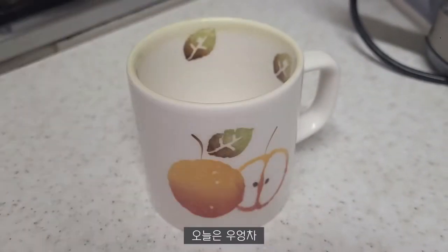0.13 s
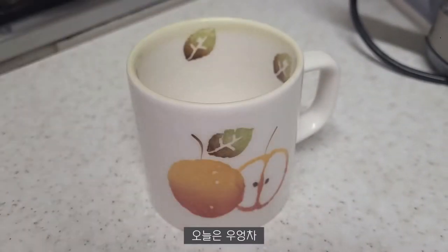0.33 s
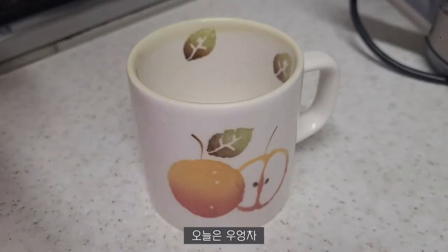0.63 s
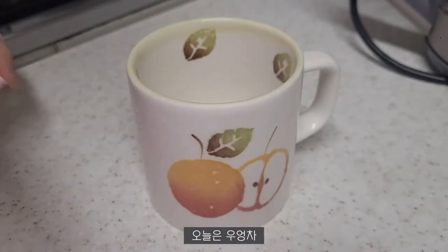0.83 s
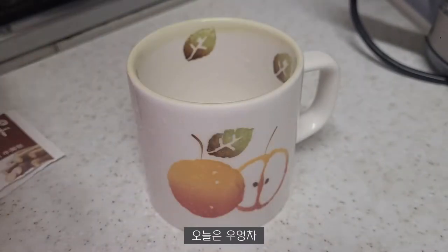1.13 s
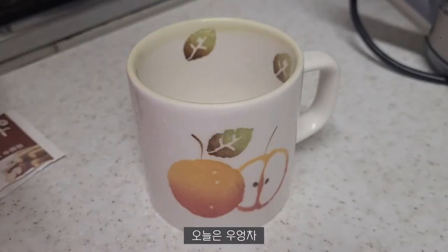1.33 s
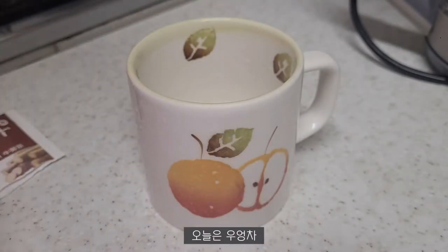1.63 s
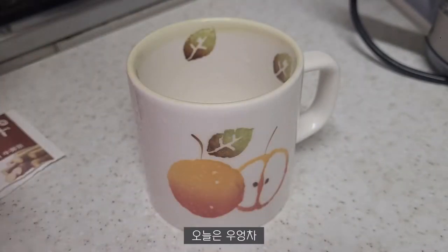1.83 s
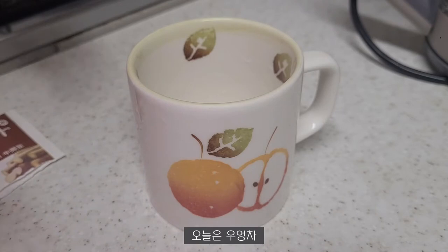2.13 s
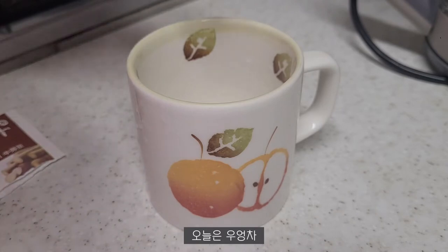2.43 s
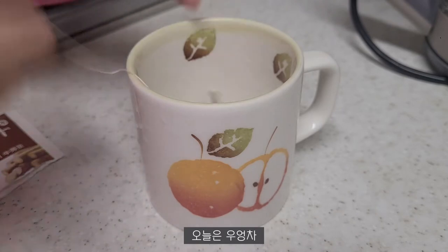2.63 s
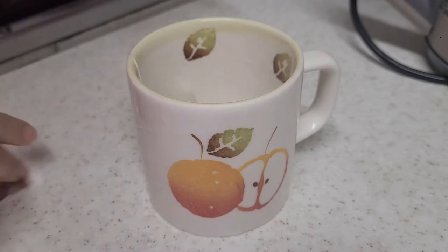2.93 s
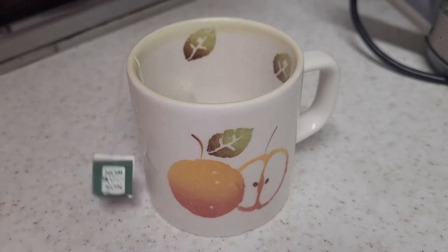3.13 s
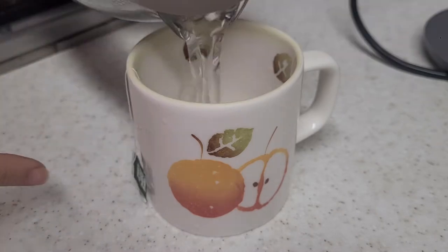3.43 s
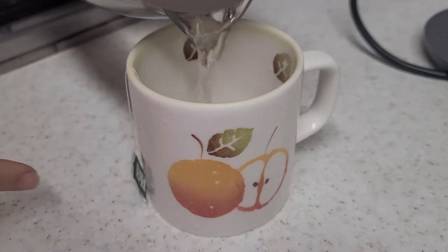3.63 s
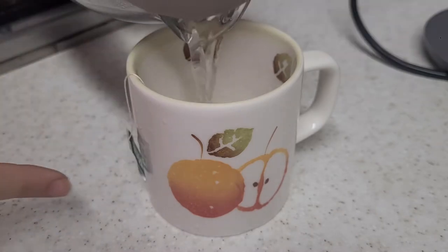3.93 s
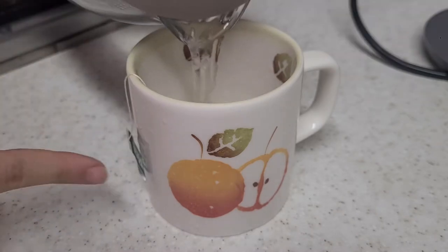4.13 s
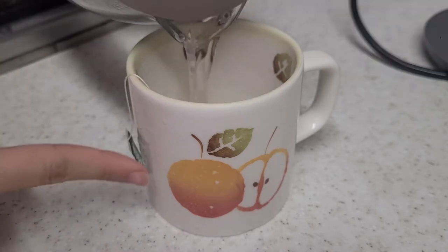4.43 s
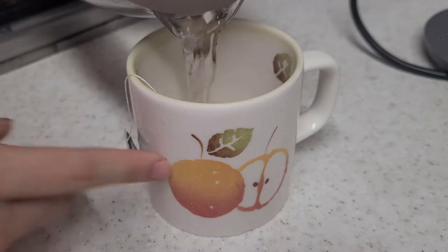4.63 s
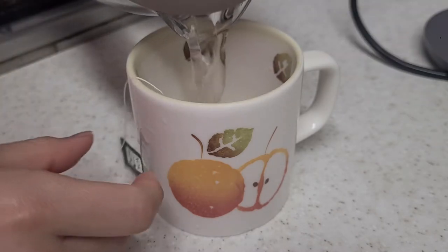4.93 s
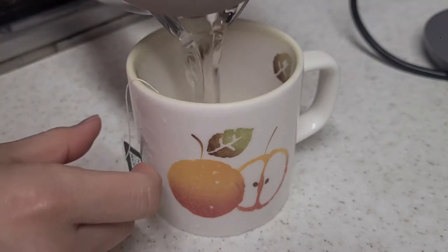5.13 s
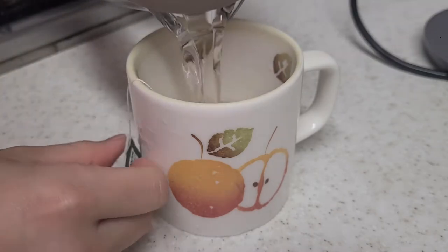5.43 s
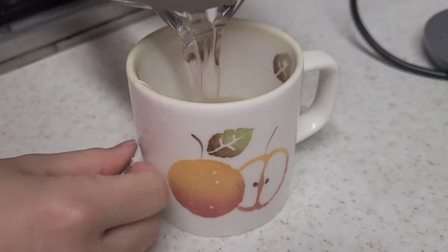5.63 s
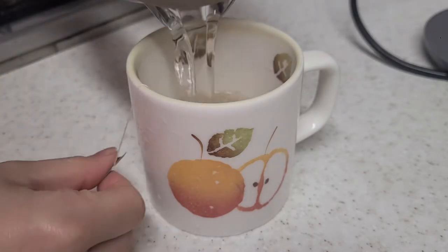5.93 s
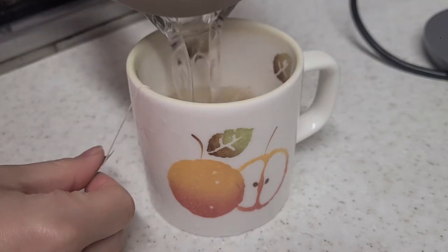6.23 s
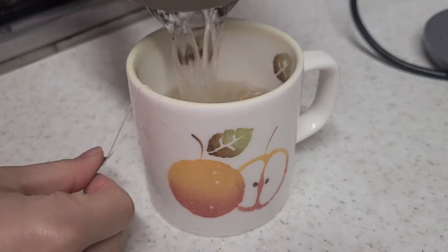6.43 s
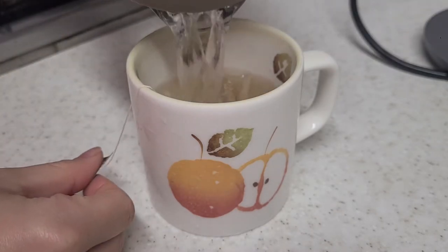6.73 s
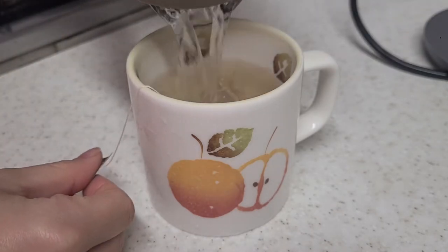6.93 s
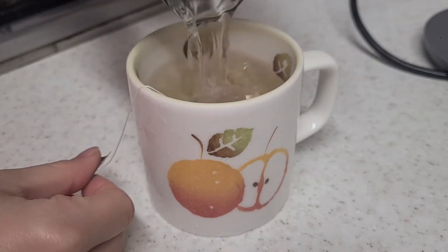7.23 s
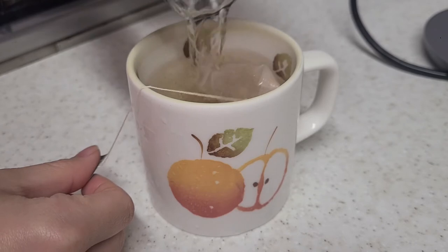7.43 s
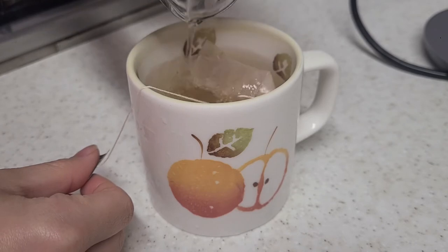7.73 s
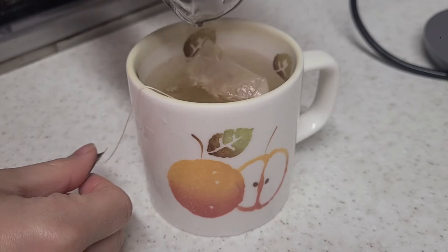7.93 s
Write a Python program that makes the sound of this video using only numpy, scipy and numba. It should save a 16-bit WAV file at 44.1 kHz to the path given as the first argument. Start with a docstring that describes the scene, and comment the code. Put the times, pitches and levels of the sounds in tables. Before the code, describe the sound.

In a small hard kitchen, a kettle rumbles with dull, irregular bubbling thumps while a paper tea sachet rustles and is torn with sharp snaps. The tea bag lands in a ceramic mug with light taps. The boiling stops, and water pours with splashy ticks, a loud low knock near the start, and a hollow tone climbing until bubbles plop near the brim. Close stereo microphones.

```python
"""A kettle rumbles as collapsing steam bubbles strike its modes, over a steady floor of hum and hiss.
Meanwhile a paper tea sachet rustles and is torn open in clumped grains, and the bag drops into a mug.
Then hot water is poured: noise drives the mug's rising air resonance, drops tick and trapped bubbles plop.
Knocks and bumps, on the worktop and of the bag hitting the mug, are struck modes with short cracks.
Two spaced microphones hear it in a small hard kitchen."""
import sys
import numpy as np
from scipy import signal
from scipy.fft import rfft, irfft, next_fast_len
from scipy.io import wavfile
from numba import njit

SR = 44100
rng = np.random.default_rng(int(sys.argv[2]) if len(sys.argv) > 2 else 0)


def unload_audio(sound):
    """Save the sound as a 16-bit wav file, at the path given as the first command line argument."""
    columns = np.transpose(np.atleast_2d(sound))
    # keep every value between -1 and 1, then stretch to whole-number steps
    steps = np.round(np.clip(columns, -1, 1) * 32767)
    wavfile.write(sys.argv[1], SR, steps.astype(np.int16))


N = 356763
SIZE = next_fast_len(N)
BIN_HZ = np.fft.rfftfreq(SIZE, 1 / SR)

# steady background spectrum: pitch_hz, relative density_db (per Hz)
FLOOR_SPECTRUM = [(24, -7), (40, -17.5), (69, -20.5), (87, -15.5), (180, -12.5), (269, -25.5), (354, -17),
                  (556, -26), (1760, -26.5), (1900, -33.5), (2800, -27), (4030, -29.5), (4340, -30),
                  (5310, -38), (6820, -33.5), (16000, -48)]
# likeness of the background at the two microphones: pitch_hz, likeness (share, clipped below 1)
LIKENESS = [(60, 0.7), (240, 1), (950, 0), (3770, 0.05), (15000, 3)]
FLOOR_DB = -69
HUM_HZ, HUM_DB = 60, -78   # mains hum, rms level

# the boil's rumble: time_s, relative level_db
BOIL = [(0.0, -48.5), (0.6, -53.5), (1.35, -56.5), (1.7, -56.5), (2.2, -57), (2.6, -61.5), (3.0, -62.5),
        (3.4, -55)]
# big steam bubbles collapsing: start_s, knock_db, bass_db
THUMPS = [(0.027, -56, -71), (0.108, -76, -61), (0.164, -50, -43.5), (0.273, -55, -50), (0.374, -50.5, -42),
          (0.448, -54, -46), (0.492, -71, -39), (0.567, -54, -38.5), (0.723, -48.5, -48), (0.826, -48, -46),
          (0.855, -40, -65), (0.907, -48, -47), (0.982, -56, -48.5), (1.015, -52.5, -48), (1.107, -54, -51),
          (1.236, -50, -63), (1.359, -73, -58), (1.446, -59, -52), (1.509, -55, -48.5), (1.555, -59, -49),
          (1.604, -49, -50), (1.716, -55, -45), (1.748, -53.5, -50), (1.866, -51.5, -46.5),
          (2.012, -53.5, -48), (2.061, -53, -51), (2.132, -49, -57), (2.214, -49, -46.5), (2.244, -58, -64),
          (2.275, -52, -53), (2.338, -59, -70), (2.376, -56, -57), (2.418, -53.5, -49), (2.511, -54.5, -55),
          (2.555, -52, -45.5), (2.606, -56.5, -60), (2.642, -55.5, -47.5), (2.721, -50.5, -49),
          (2.837, -51, -52), (2.881, -56, -46), (2.93, -52.5, -50), (3.036, -56, -76), (3.099, -51, -68),
          (3.133, -52, -53.5), (3.231, -51.5, -78), (3.338, -56.5, -69), (3.358, -54.5, -45.5)]
# modes of the kettle body and water, bass then knock: pitch_hz, level_db, t60_s
KETTLE_LOW = [(64, -13, 0.091), (115.6, -12.5, 0.17), (136, -1, 0.038), (186.2, -5.5, 0.15),
              (239, 0.5, 0.047), (340, -11, 0.029)]
KETTLE_HIGH = [(532, 0, 0.043), (608.5, -2, 0.043), (688, 0, 0.044), (354, -10, 0.03), (845, -8, 0.02),
               (1050, 4, 0.0084), (1322, -2.5, 0.021), (1774, -16.5, 0.029)]
BOIL_END_S = 3.41
# lesser collapses: how many, their levels against the rumble, half-range of their spread
LESSER_THUMPS = 30
LESSER_DB, LESSER_BASS_DB, LESSER_SPREAD_DB = -7, -5, 4
RUMBLE_FLUTTER_DB, RUMBLE_FLUTTER_HZ = 2.5, 14

# paper in the hands: time_s, rustle level_db
RUSTLE = [(0.0, -76), (0.19, -60), (0.48, -71.5), (0.65, -68), (0.8, -67), (1.5, -59), (1.74, -60),
          (1.92, -66.5), (2.85, -67.5), (3.4, -71)]
# rips and snaps of the paper: start_s, level_db, held_s, treble_db (against the level), brightest pitch_hz
RIPS = [(0.1643, -96, 0.017, -1, 4000), (0.381, -54.5, 0.00092, -3, 2660),
        (0.397, -49.5, 0.0027, -11, 1960), (0.411, -54.5, 0.0042, -7, 3470), (0.42, -68, 0.018, -9, 4000),
        (0.514, -35.5, 0.0057, 1, 6400), (0.522, -38, 0.0033, -1, 4340), (0.53, -39, 0.018, 3, 6660),
        (0.55, -37.5, 0.0096, -23, 3300), (0.5635, -32.5, 0.001, -3.5, 2760), (0.667, -58, 0.011, -1, 7000),
        (0.69, -31, 0.0015, -6, 3040), (0.8147, -49.5, 0.0017, -2.5, 6300), (0.832, -40, 0.0061, -5, 3860),
        (0.85, -54, 0.0008, 4, 6450), (0.857, -36, 0.0013, -4.5, 3000), (1.033, -52, 0.023, 1.5, 7300),
        (1.062, -49, 0.003, -4, 2640), (1.0863, -59.5, 0.0051, 0, 5000), (1.334, -51.5, 0.0015, 5.5, 7200),
        (1.4168, -62, 0.0056, -34, 3000), (1.439, -55, 0.01, 3.5, 6800), (1.601, -59, 0.015, 2, 7600),
        (1.78, -66.5, 0.051, 7, 4200), (1.823, -55, 0.0094, -8, 3000), (1.837, -56, 0.016, -13, 2900),
        (2.474, -70, 0.021, 0.5, 4600), (2.5476, -63, 0.011, -1, 6600), (2.5614, -50.5, 0.00094, 0, 3220),
        (2.758, -51.5, 0.0024, -10, 3400), (2.775, -51, 0.0062, -15, 3470), (2.809, -58, 0.045, -4.5, 3500),
        (2.835, -55, 0.043, -15, 2280), (2.884, -39, 0.0013, -15, 3620), (2.9106, -55.5, 0.024, -4, 6850),
        (2.9394, -72, 0.03, 0, 3200), (2.979, -62.5, 0.014, -7, 6900), (3.261, -67, 0.012, 0.5, 3800)]
# spectrum of the parting fibres: pitch_hz, relative density_db (per Hz)
PAPER_SPECTRUM = [(710, -25), (1200, 2), (1310, -6.5), (1510, -11.5), (2620, -7), (3700, -4), (4450, -11),
                  (7170, -1), (7910, -7), (12500, -13), (16000, -20.5)]
BAG_IN_MUG_S, BAG_STILL_S = 2.74, 3.05
# treble hiss: its level at the mean rustle, and its dB of growth per dB of rustle
MEAN_RUSTLE_DB, HISS_DB, HISS_GROWTH = -70, -76.5, 1.35
# a longer rip swells and dies more slowly and snaps less; a low body lies under it
RIP_SWELL_S, RIP_SWELL_PER_HELD = 0.0019, 0.24
RIP_T60_S, RIP_T60_PER_HELD = 0.027, 5.9
SNAP_LOSS_DB_PER_S, RIP_BODY_DB = 509, -13
# the band about each rip's own pitch: level and full width
RIP_COLOUR_DB, RIP_COLOUR_OCT = -4.5, 0.86

# knocks and bumps, on the worktop and of the bag hitting the mug:
# start_s, level_db, brightness_db, own pitch_hz, own-pitch level_db (relative)
KNOCKS = [(0.567, -34.5, 23.5, 129, -2), (2.559, -40.5, -9, 131, 2.5), (2.773, -41, 24.5, 314, 5.5),
          (2.882, -36.5, 19, 270, -18), (3.915, -49, 13, 814, -2.5), (3.926, -12.5, -5, 169.6, -7),
          (3.958, -44, -11, 110.5, 0), (3.98, -26.5, -20, 170.4, -2.5), (4.701, -52.5, 6, 103, 4.5),
          (4.749, -43, -22, 106, -17), (5.733, -49, 8, 1250, -5), (6.232, -43, 15, 1225, -8),
          (6.249, -44.5, 14.5, 1214, -7.5), (6.3307, -33.5, 12, 1150, -16), (6.399, -56, -4, 270, -2),
          (6.408, -36, 11, 113, -21), (7.002, -64, -4, 111, 12.5), (7.1191, -49, 22.5, 175, -11),
          (7.135, -54.5, 22, 1200, -16)]
# modes that every knock or bump sets ringing: pitch_hz, level_db, t60_s
KNOCK_MODES = [(96.3, -4, 0.18), (120.7, 1.5, 0.13), (183, -3.5, 0.081), (245.6, -5.5, 0.076),
               (309.2, -2, 0.094), (423, -4, 0.07), (662, 3.5, 0.016), (903, -2.5, 0.026),
               (1130, 2.5, 0.016), (1117, -22.5, 0.04)]

# faint hum of the empty mug: pitch_hz, level_db, t60_s
EMPTY_MUG = [(2100, -78, 0.017), (3160, -72, 0.023), (7100, -85.5, 0.02)]
# fixed resonances of the mug: pitch_hz, width_hz, level_db
MUG = [(1893, 1300, -34), (2620, 515, -18), (3330, 560, 4), (3500, 1840, -1.5), (3940, 800, -4),
       (5220, 1300, 1.5), (6850, 950, 6)]

# the pour: time_s, splash level_db
POUR = [(3.42, -73), (3.55, -70), (3.8, -73), (4.1, -78), (4.35, -75), (4.6, -72), (5.0, -81.5),
        (5.17, -74), (5.26, -61.5), (5.36, -73.5), (5.5, -69), (5.62, -72), (5.74, -67.5), (5.78, -77),
        (5.9, -76), (6.15, -76), (6.34, -63.5), (6.48, -74), (6.8, -75), (6.92, -83), (7.06, -70),
        (7.2, -102)]
# resonance of the air above the water: time_s, pitch_hz, width_hz
AIR = [(3.42, 945, 55), (3.9, 980, 100), (4.45, 1010, 240), (4.9, 1100, 160), (5.35, 1214, 150),
       (5.75, 1310, 160), (6.3, 1280, 130), (7.2, 1330, 150)]
# the mug's wall singing under the stream: time_s, pitch_hz, level_db
WALL = [(3.42, 3250, -88), (3.66, 3200, -90), (3.74, 3265, -72), (4.2, 3240, -77.5), (4.7, 3325, -76),
        (5.05, 3280, -83), (5.3, 3320, -80), (5.6, 3340, -81.5), (6.2, 3430, -80.5), (6.6, 3410, -86),
        (7.2, 3480, -94)]
# gulps that make the air ring up: start_s, peak level_db
GURGLES = [(3.572, -66), (3.688, -82), (3.801, -60), (3.84, -63), (4.13, -53.5), (4.164, -57), (4.387, -53),
           (4.439, -61.5), (4.543, -72), (4.707, -66), (4.752, -55), (5.233, -61), (5.631, -54),
           (5.712, -51), (6.168, -53), (6.233, -52), (6.331, -41), (6.409, -50)]
# broader ring climbing fast as the water nears the brim: time_s, pitch_hz, level_db
BRIM = [(6.439, 1700, -78), (6.6, 1800, -67), (6.75, 2220, -69), (6.88, 3300, -59.5), (7.08, 4070, -72)]
POUR_START_S, POUR_END_S = POUR[0][0], POUR[-1][0]
# FOLLOWS: dB of change per dB of splash
MEAN_SPLASH_DB = -72
AIR_DB, AIR_FADE_DB_PER_S, AIR_FOLLOWS = -65.5, 1, 0.32
AIR_WAVER = 0.01   # spread of the pitch, as a share
# the air's ring gives out once the brim's ring takes over
AIR_GIVES_OUT_S, AIR_LOSS_DB_PER_S = 6.73, 32
# rough skirt about the air's ring, growing as the surface churns
SKIRT_WIDTH_HZ, SKIRT_DB, SKIRT_GROWS_DB_PER_S = 280, -9, 3.5
WALL_WIDTH_HZ, WALL_FLICKER_DB = 75.0, 3.5
SPRAY_DB, SPRAY_FOLLOWS, SLOSH_DB, SLOSH_FOLLOWS = -82.5, 1.2, -72.5, 0.083

# drops and splashes: start_s, level_db, pitch_hz, treble_db (relative)
DROPS = [(3.423, -49, 4100, -17), (3.4566, -50, 6960, -1), (3.4954, -42, 2830, -4),
         (3.5713, -37.5, 6800, -10.5), (3.599, -40, 7000, -9), (3.6863, -51, 7120, 2.5),
         (3.698, -45, 5200, -5), (3.728, -32.5, 3370, -16), (3.7805, -35.5, 3680, -43),
         (3.8422, -49, 3200, -10), (3.8703, -40, 3300, -20), (3.9306, -37, 1420, -28),
         (3.9696, -38.5, 7100, -2), (4.0132, -44.5, 6960, -22), (4.235, -60, 3160, -14),
         (4.367, -54, 3400, 10), (4.427, -55, 3300, -7), (4.449, -50, 3400, 4.5), (4.462, -38, 6070, -14),
         (4.545, -47.5, 3640, -6), (4.563, -44, 3420, -14), (4.579, -52, 3400, -12),
         (4.572, -40.5, 3530, -21), (4.612, -43.5, 3400, -18), (4.652, -37, 3350, -19),
         (4.728, -49, 6940, -4.5), (4.7994, -45.5, 7100, 2), (4.864, -47, 3370, -19),
         (5.0128, -53.5, 3370, -1), (5.1855, -46, 3600, -21), (5.2112, -66, 3330, -9),
         (5.236, -45, 6860, -6), (5.2612, -52, 7240, 0), (5.2782, -43, 3420, 0), (5.324, -41.5, 3400, -26),
         (5.4216, -56.5, 3340, 13), (5.45, -51.5, 3320, 2), (5.508, -47.5, 7240, 1), (5.5315, -49, 7100, 5),
         (5.633, -50.5, 2500, -2), (5.6516, -48, 3300, -4), (5.675, -48, 3200, 0), (5.7044, -45.5, 3660, 2),
         (5.733, -47, 1420, 7.5), (5.862, -58, 7100, 2.5), (5.929, -42.5, 7100, -10),
         (5.936, -45, 7100, -9), (6.021, -47, 6900, -10), (6.025, -43, 6950, -4), (6.0712, -47.5, 3500, -8),
         (6.09, -47, 7200, -4), (6.149, -49, 7660, 0), (6.1706, -38.5, 3300, -10), (6.193, -52, 3500, 2),
         (6.231, -34.5, 3480, -4), (6.248, -38, 3470, -13), (6.2907, -37, 3400, -7), (6.303, -40, 3250, -3),
         (6.361, -47, 3400, -8), (6.329, -44, 1510, 0), (6.387, -35.5, 1680, -4), (6.407, -43, 1870, -24),
         (6.46, -34.5, 3660, -32), (6.473, -44, 1900, -12), (6.51, -43, 2200, -19),
         (6.5374, -39, 6900, -16), (6.5565, -58, 2380, -11), (6.5733, -38, 6850, -4),
         (6.6047, -35.5, 1810, -32), (6.628, -42, 4130, -11), (6.643, -57, 6800, -9),
         (6.667, -45, 7000, -8), (6.697, -37.5, 2000, -22), (6.7328, -39.5, 7100, -5),
         (6.741, -52, 2490, -10), (6.8034, -36.5, 1930, -14), (6.8154, -38, 2470, -12),
         (6.8432, -37.5, 3500, -16), (6.8697, -63, 2570, -4), (6.903, -58, 3500, -15),
         (6.947, -57, 3200, -12), (6.976, -42, 4130, -2), (7.009, -47, 5900, -1), (7.0868, -48, 2300, -13),
         (7.095, -45.5, 2470, -14), (7.1173, -35, 3940, -8), (7.1345, -38.5, 3320, -8),
         (7.538, -52, 6500, -15), (7.6334, -53, 6860, -3), (7.745, -57.5, 7050, -4)]
DROP_T60_S, DROP_CYCLES = 0.016, 14   # spatter decay; cycles of ringing to fall 60 dB
DROP_UNDER_OCT, DROP_OVER_OCT = 0.35, 0.65   # band below and above a drop's pitch
DROP_BODY_DB, DROP_BODY_DB_PER_S = -29.5, 4   # low body, growing through the pour
FIZZ_DB, FIZZ_T60_S = -7, 0.03   # treble that fizzes on after the click
WALL_STRUCK_DB = 63.5   # a drop's ring in the wall, against the wall's level
FAINT_DROPS = 24
FAINT_DB, FAINT_SPREAD_DB, FAINT_TREBLE_DB = -78, -15.5, -3
BRIM_BUBBLES, BUBBLE_DB, BUBBLE_SCATTER_OCT = 70, -62, 0.77
# droplets: time range of landing, level against the parent drop, full range of pitch
DROPLET_RANGE_S, DROPLET_DB, DROPLET_SCATTER_OCT = 0.035, -17.5, 0.27

# bubbles caught under the surface: start_s, level_db, starting pitch_hz, decay_cycles (to fall 60 dB)
PLOPS = [(4.657, -58, 2330, 270), (6.41, -57, 1870, 50), (6.461, -56, 1900, 50), (6.472, -46, 1895, 90),
         (6.51, -50, 2140, 50), (6.535, -60, 2300, 50), (6.555, -51, 2360, 86), (6.61, -64, 1950, 80),
         (6.676, -60, 2010, 60), (6.7, -48, 1990, 52), (6.74, -53, 2520, 38), (6.76, -65, 2390, 46),
         (6.785, -60, 2900, 50), (6.87, -57, 2530, 60), (6.89, -67, 2620, 50), (6.935, -60, 3100, 50),
         (6.95, -58, 3280, 60), (6.977, -44, 4080, 77), (7.0, -66, 4300, 60), (7.03, -59, 1360, 60),
         (7.091, -62, 1850, 70)]
PLOP_RISE = 0.028   # the pitch climbs by twice this share per 60 dB of decay

KITCHEN_T60_S, NEAR_T60_S, WALL_CUT_HZ = 0.21, 0.056, 8700
CUTOFF_HZ = 16650


def amp(db):
    """Decibel law: the gain of a level."""
    return 10 ** (np.asarray(db) / 20)


def rms_one(x):
    """Normalisation: x scaled to rms 1."""
    return x / np.sqrt(np.mean(x ** 2) + 1e-20)


def in_time(rows, edge_s=0.0064):
    """Linear interpolation: each column at every sample, then a gate open from first row to last."""
    s, *columns = np.transpose(rows)
    t = np.arange(N) / SR
    gate = np.clip(np.minimum(t - s[0], s[-1] - t) / edge_s + 1, 0, 1)
    return [np.interp(t, s, c) for c in columns] + [gate]


def at_hz(points, hz):
    """Logarithmic frequency scale: a spectrum interpolated upon it."""
    point_hz, value = np.transpose(points)
    return np.interp(np.log(np.maximum(hz, 1)), np.log(point_hz), value)


def drift(rate_hz):
    """Low-pass random process: noise twice through a one-pole filter, with spread 1."""
    step = 40   # computed at every 40th sample
    r = np.exp(-2 * np.pi * rate_hz * step / SR)
    noise = rng.standard_normal(N // step + 2002)
    slow = signal.lfilter([1], [1, -2 * r, r * r], noise)[2000:]
    return np.interp(np.arange(N) / step, np.arange(len(slow)), rms_one(slow))


def band(x, low_hz, high_hz):
    """Butterworth band-pass filtering."""
    edges = [low_hz, min(high_hz, .45 * SR)]
    return signal.sosfilt(signal.butter(2, edges, "band", fs=SR, output="sos"), x)


def coloured(spectrum, x):
    """Spectral shaping: x multiplied by a spectrum, at rms 1."""
    return rms_one(irfft(rfft(x, SIZE) * amp(at_hz(spectrum, BIN_HZ)), SIZE)[..., :N])


def ring(clicks, hz, t60):
    """Damped oscillator: a unit click starts a dying sine of height 1."""
    r, w = amp(-60 / (t60 * SR)), 2 * np.pi * hz / SR
    return signal.lfilter([0, np.sin(w)], [1, -2 * r * np.cos(w), r * r], clicks + 1e-18)


@njit
def sweep(x, hz, width_hz):
    """Time-varying resonance: a two-pole filter whose centre and width may move."""
    out, r = np.zeros(len(x)), np.exp(-np.pi * (width_hz + 0 * hz) / SR)
    for i in range(2, len(x)):
        out[i] = x[i] + 2 * r[i] * np.cos(2 * np.pi * hz[i] / SR) * out[i - 1] - r[i] * r[i] * out[i - 2]
    return out


def grains(per_s, spread_db):
    """Random impulse process: clicks at chance moments, mostly small, a few large."""
    sizes = amp(spread_db * np.minimum(rng.exponential(1, N), 4)) * rng.choice([-1, 1], N)
    return sizes * (rng.random(N) < per_s / SR)


def bursts(times, level_db, t60):
    """Exponential decay: an envelope that jumps at each time and dies away."""
    jumps = np.full(N, 1e-18)
    jumps[np.round(np.asarray(times) * SR).astype(int)] = amp(level_db)
    return signal.lfilter([1], [1, -amp(-60 / (t60 * SR))], jumps)


def strike(times, level_db, modes, scatter_db, rest=0):
    """Modal excitation: each blow, and a running drive 'rest', rings every mode; blows vary by mode."""
    at, out = np.round(times * SR).astype(int), 0
    luck = rng.standard_normal((len(at), len(modes)))
    for k, (hz, mode_db, t60) in enumerate(modes):
        clicks = np.zeros(N) + rest
        clicks[at] += amp(level_db + scatter_db * luck[:, k]) * (-1) ** k
        out = out + amp(mode_db) * ring(clicks, hz, t60)
    return out


def in_mug(x):
    """Parallel resonance: x through the fixed resonances of the mug, at rms 1."""
    return rms_one(sum(amp(db) * rms_one(band(x, hz - w / 2, hz + w / 2)) for hz, w, db in MUG))


def add(out, s, sound):
    """Superposition: a short sound mixed in at time s."""
    i = round(s * SR)
    out[i:i + len(sound)] += sound[:N - i]


def floor():
    """Interchannel coherence: steady hum and hiss whose likeness at both microphones is set by pitch."""
    alike = np.clip(at_hz(LIKENESS, BIN_HZ), 0, .98)
    shape = amp(at_hz(FLOOR_SPECTRUM, BIN_HZ)) * np.sqrt([1 + alike, 1 - alike])
    mid, side = irfft(rfft(rng.standard_normal((2, SIZE))) * shape, SIZE)[:, :N]
    hiss = amp(FLOOR_DB) * rms_one(np.array([mid + side, mid - side]))
    hum = amp(HUM_DB) * 2 ** .5 * np.sin(2 * np.pi * HUM_HZ * np.arange(N) / SR)
    return hiss + hum


def kettle():
    """Bubble collapse: blows, swarms of small ones and a thin rumble excite the kettle's modes."""
    rumble_db, _ = in_time(BOIL)
    on = np.clip((BOIL_END_S - np.arange(N) / SR) / 0.004, 0, 1)
    when, *luck = rng.random((LESSER_THUMPS, 3)).T
    when = when * BOIL_END_S
    usual_db = rumble_db[(when * SR).astype(int)] + LESSER_SPREAD_DB * 2 * (np.array(luck) - .5)
    lesser = [when, usual_db[0] + LESSER_DB, usual_db[1] + LESSER_BASS_DB]
    s, high_db, low_db = np.hstack([np.transpose(THUMPS), lesser])

    small = rms_one(grains(600, spread_db=3.0))
    rumble = amp(rumble_db + RUMBLE_FLUTTER_DB * drift(RUMBLE_FLUTTER_HZ))
    low_drive = small * (amp(-29.5) * rumble + amp(-43.0) * bursts(s, low_db, 0.025))
    high_drive = small * (amp(-32.5) * rumble + amp(-24.5) * bursts(s, high_db, 0.045))
    low = strike(s, low_db, KETTLE_LOW, 1.6, rest=low_drive)
    high = strike(s + 0.002974, high_db, KETTLE_HIGH, 2.3, rest=high_drive)   # just after the bass
    return on * (low + high)


def paper():
    """Fibre fracture: clumped grains at two places on the sheet make a rustle, and rips that snap and die."""
    rustle_db, gate = in_time(RUSTLE)
    hiss_db = HISS_DB + HISS_GROWTH * (rustle_db - MEAN_RUSTLE_DB)
    clumps = amp(5 * drift(60))
    crackle = np.array([rms_one(grains(2500 * clumps, spread_db=4.5)) for _ in range(2)])
    crackle = crackle + .5 * rng.standard_normal((2, N))
    fibres = coloured(PAPER_SPECTRUM, crackle)
    middle, treble = rms_one(band(fibres, 1180, 11900)), rms_one(band(fibres, 10180, 18500))
    # the bag now rubs the mug's wall
    inside = slice(round(BAG_IN_MUG_S * SR), round(BAG_STILL_S * SR))
    middle[:, inside] = 0.33 * middle[:, inside] + 0.48 * in_mug(crackle[:, inside])
    body = rms_one(band(crackle, 170, 2260))
    out = gate * amp(1.4 * drift(5.5)) * (amp(rustle_db) * middle + amp(hiss_db) * treble)

    t = np.arange(SR // 6) / SR
    half_colour = 2 ** (RIP_COLOUR_OCT / 2)
    for s, level_db, held_s, treble_db, hz in RIPS:
        rise_s = RIP_SWELL_S + RIP_SWELL_PER_HELD * held_s
        t60 = RIP_T60_S + RIP_T60_PER_HELD * held_s
        now = slice(round(s * SR), round(s * SR) + len(t))
        bright = rms_one(band(crackle[:, now], hz / half_colour, hz * half_colour))
        mix = middle[:, now] + amp(RIP_COLOUR_DB) * bright
        mix = mix + amp(RIP_BODY_DB) * body[:, now] + amp(treble_db) * treble[:, now]
        swell = np.minimum(t / rise_s, 1)
        # the moment the crease gives way
        snap = 1 + amp(9.5 - SNAP_LOSS_DB_PER_S * held_s - 60 * np.abs(t - rise_s) / 0.0035)
        decay_db = 60 * np.maximum(t - rise_s - held_s, 0) / t60
        out[:, now] += swell * snap * amp(level_db - decay_db) * mix
    return out


def knocks():
    """Impact: a blow rings shared modes and a pitch of its own; a brighter one adds a stronger crack."""
    s, level_db, bright_db, own_hz, own_db = np.transpose(KNOCKS)
    out, t = strike(s, level_db - 12.0, KNOCK_MODES, 0.9), np.arange(3000) / SR
    noise = rms_one(band(rng.standard_normal((len(s), len(t))), 480, 3150))
    crack_envelope = amp(-60 * t / 0.014) + amp(6.0 - 60 * t / 0.0019)
    for k, at in enumerate(s):
        own = np.sin(2 * np.pi * own_hz[k] * t) * amp(own_db[k] - 60 * t / 0.081)
        crack = amp(bright_db[k] - 18.5) * crack_envelope * noise[k]
        add(out, at, amp(level_db[k]) * (own + crack))
    return -out     # the struck surface moves away first


def empty_mug():
    """Driven resonance: noise keeps the mug's modes faintly ringing from the bag's fall to the pour."""
    _, gate = in_time([(BAG_IN_MUG_S, 0), (BOIL_END_S - .01, 0)])
    out = 0
    for hz, db, t60 in EMPTY_MUG:
        level = amp(db + 3.5 * drift(16))
        out = out + level * rms_one(ring(rng.standard_normal(N), hz, t60))
    return gate * out


def air_column(stream, poured_s):
    """Air-column resonance: the stream excites a moving, wavering ring with a broad rough skirt."""
    hz, width_hz, _ = in_time(AIR)
    hz = hz * (1 + AIR_WAVER * drift(8))
    twice = sweep(sweep(stream, hz, width_hz), hz, 317.0)
    core = rms_one(np.sqrt(width_hz) * band(twice, 721, 1550))
    skirt = rms_one(band(sweep(stream, hz, SKIRT_WIDTH_HZ), 645, 1300))
    return rms_one(core + amp(SKIRT_DB + SKIRT_GROWS_DB_PER_S * poured_s) * skirt)


def pour():
    """Forced resonance: the stream drives the air column and wall and spatters into the mug's modes."""
    splash_db, gate = in_time(POUR)
    t = np.arange(N) / SR
    swing_db, poured_s = splash_db - MEAN_SPLASH_DB, np.maximum(t - POUR_START_S, 0)
    air_db = AIR_DB - AIR_FADE_DB_PER_S * poured_s + AIR_FOLLOWS * swing_db
    air_db = air_db - AIR_LOSS_DB_PER_S * np.maximum(t - AIR_GIVES_OUT_S, 0)
    stream = rms_one(grains(1500, spread_db=0.0)) + .5 * rng.standard_normal(N)
    air = air_column(stream, poured_s)
    gulps = bursts(*np.transpose(GURGLES), 0.072)

    wall_hz, wall_db, _ = in_time(WALL)
    wall_level = amp(wall_db + WALL_FLICKER_DB * drift(24))
    wall = wall_level * rms_one(band(sweep(stream, wall_hz, WALL_WIDTH_HZ), 3150, 3670))

    spatter = rms_one(grains(1200 * amp(6.2 * drift(19)), spread_db=7.5)) + 0.5 * rng.standard_normal(N)
    brim_hz, brim_db, brim_gate = in_time(BRIM)
    brim = brim_gate * amp(brim_db) * rms_one(band(sweep(spatter, brim_hz, 520.0), 800, 3700))
    spray = amp(SPRAY_DB + SPRAY_FOLLOWS * swing_db) * rms_one(band(spatter, 8400, 18000))
    slosh = rms_one(band(rng.standard_normal(N), 74.0, 360))
    slosh = slosh * amp(SLOSH_DB + SLOSH_FOLLOWS * swing_db + 5.4 * drift(11.4))
    wet = amp(splash_db) * in_mug(spatter) + spray + slosh + brim + wall
    return gate * (amp(air_db + 2.5 * drift(23.8)) * air + gulps * air + wet)


def faint_drops():
    """Random arrivals: faint drops through the pour, ringing at the mug's two clearest resonances."""
    when, size, which = rng.random((FAINT_DROPS, 3)).T
    s = POUR_START_S + when * (POUR_END_S - POUR_START_S)
    db = FAINT_DB + FAINT_SPREAD_DB * 2 * (size - .5)
    hz = np.where(which < .5, MUG[2][0], MUG[-1][0])
    return np.transpose([s, db, hz, np.full(FAINT_DROPS, FAINT_TREBLE_DB)])


def brim_bubbles():
    """Random arrivals: small bubbles scattered in pitch about the climbing ring near the brim."""
    when, size, which = rng.random((BRIM_BUBBLES, 3)).T
    brim_s, brim_hz, _ = np.transpose(BRIM)
    s = brim_s[0] + when * (brim_s[-1] - brim_s[0])
    db = BUBBLE_DB + FAINT_SPREAD_DB * 2 * (size - .5)
    hz = np.interp(s, brim_s, brim_hz) * 2 ** (BUBBLE_SCATTER_OCT * (which - .5))
    return np.transpose([s, db, hz, np.full(BRIM_BUBBLES, FAINT_TREBLE_DB - 5.5)])


def droplets():
    """Secondary splash: every drop throws up two fainter droplets that land soon after."""
    late, which = rng.random((2, len(DROPS), 2))
    s, db, hz, treble_db = np.transpose(DROPS)[..., None]
    landing = [s + 0.0045 + DROPLET_RANGE_S * late, db + DROPLET_DB + 0 * late,
               hz * 2 ** (DROPLET_SCATTER_OCT * (which - .5)), treble_db + 0 * late]
    return np.reshape(landing, (4, -1)).T


def drops():
    """Impulse response: a sharp click and short spatter ring at the drop's pitch and in the mug's wall."""
    out, t = np.zeros(N), np.arange(1000) / SR
    every = np.vstack([DROPS, faint_drops(), brim_bubbles(), droplets()])
    envelope = amp(-60 * t / 0.00026) + amp(-17 - 60 * t / DROP_T60_S)
    impact = rng.standard_normal((len(every), len(t))) * envelope
    fizz = impact + rng.standard_normal(impact.shape) * amp(FIZZ_DB - 60 * t / FIZZ_T60_S)
    impact[:, 0] += 1.5 * np.sign(impact[:, 0])   # sharpens the click
    layers = [in_mug(impact), band(fizz, 8000, 16500), band(impact, 600, 2600)]
    broad, treble, body = (x / np.max(np.abs(x), axis=1, keepdims=True) for x in layers)
    wall_hz, wall_db, _ = (x[(every[:, 0] * SR).astype(int)] for x in in_time(WALL))

    for k, (s, db, hz, treble_db) in enumerate(every):
        own = band(impact[k], hz / 2 ** DROP_UNDER_OCT, hz * 2 ** DROP_OVER_OCT)
        # the mug wall sings along
        wall = amp(wall_db[k] + WALL_STRUCK_DB) * ring(impact[k], wall_hz[k], 0.043)
        ringing = ring(impact[k], hz, DROP_CYCLES / hz) + wall
        body_db = DROP_BODY_DB + DROP_BODY_DB_PER_S * (s - POUR_START_S)
        tick = amp(-6.5) * broad[k] + amp(-10.5) * own / np.max(np.abs(own))
        tick = tick + amp(treble_db) * treble[k] + amp(body_db) * body[k]
        add(out, s, amp(db) * (amp(-0.5) * ringing / np.max(np.abs(ringing)) + tick))
    return out


def plops():
    """Bubble resonance: a trapped bubble rings as a dying sine that climbs a little."""
    out, t = np.zeros(N), np.arange(3000) / SR
    for s, db, hz, cycles in PLOPS:
        decay = t * hz / cycles   # reaches 1 at 60 dB down
        add(out, s, amp(db - 60 * decay) * np.sin(2 * np.pi * hz * t * (1 + PLOP_RISE * decay)))
    return out


def heard(x, pan_db, left_lag, near_db, wet_db):
    """Arrival-time difference: direct sound lags at the left by left_lag samples; echoes follow."""
    t, direct_at = np.arange(SR // 4) / SR, 30
    noise = rng.standard_normal((3, len(t)))
    # long waves are alike at both
    both = noise[:2] + signal.lfilter(*signal.butter(2, 600, fs=SR), noise[2] - noise[:2])
    # worktop echoes come at once, walls later
    near = band(both, 435, 11300) * amp(-60 * t / NEAR_T60_S) * (t > .001)
    walls = signal.lfilter(*signal.butter(1, WALL_CUT_HZ, fs=SR), both)
    walls = walls * amp(-60 * t / KITCHEN_T60_S) * (t > .004)
    echoes = (amp(near_db) * rms_one(near) + amp(wet_db) * rms_one(walls)) / np.sqrt(len(t))
    echoes[0, direct_at + left_lag] += 1
    echoes[1, direct_at] += 1
    wet = signal.oaconvolve(x[None], echoes, axes=1)[:, direct_at:N + direct_at]
    return wet * amp([[pan_db / 2], [-pan_db / 2]])


def scene():
    """Superposition: sources summed, each at its own place between the microphones."""
    boil = heard(kettle(), pan_db=-2.5, left_lag=14, near_db=-8, wet_db=-15)
    corner, edge = paper()
    hands = heard(corner, pan_db=-1.0, left_lag=-19, near_db=-9, wet_db=-15)
    hands += heard(edge, pan_db=-3.5, left_lag=-9, near_db=-7, wet_db=-18.5)
    blows = heard(knocks(), pan_db=-2.0, left_lag=-6, near_db=-6, wet_db=-11.5)
    in_and_at_mug = empty_mug() + pour() + drops() + plops()
    mug = heard(in_and_at_mug, pan_db=-4.0, left_lag=-18, near_db=-10, wet_db=-16)
    return floor() + boil + hands + blows + mug


def record(dry):
    """Band limitation: the microphones lose the deepest bass; the top is cut steeply."""
    thin = signal.sosfilt(signal.butter(3, 45, "high", fs=SR, output="sos"), dry)
    return signal.sosfilt(signal.cheby2(16, 70, CUTOFF_HZ, fs=SR, output="sos"), thin)


dry = scene()
out = record(dry)
unload_audio(out)
```